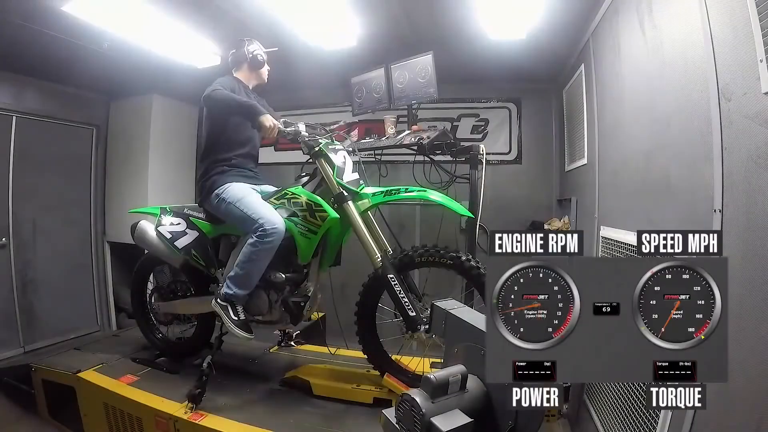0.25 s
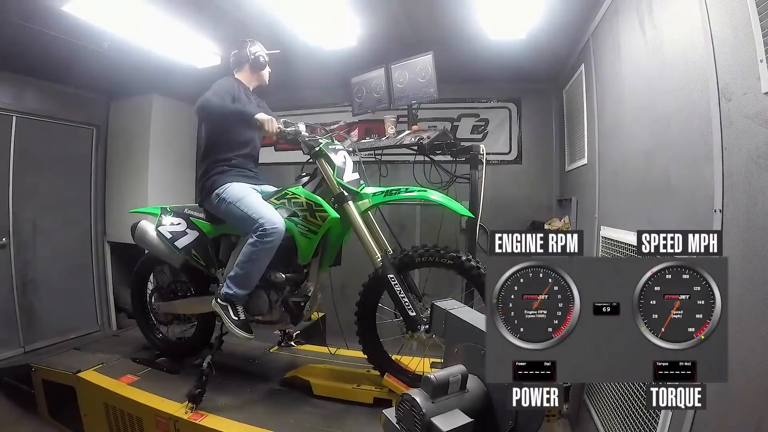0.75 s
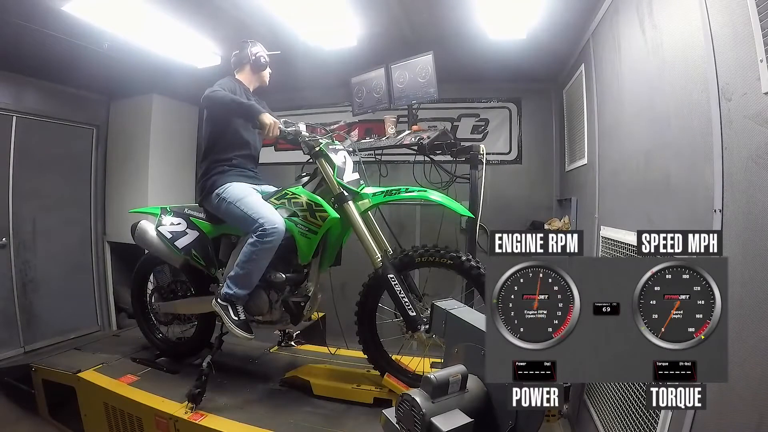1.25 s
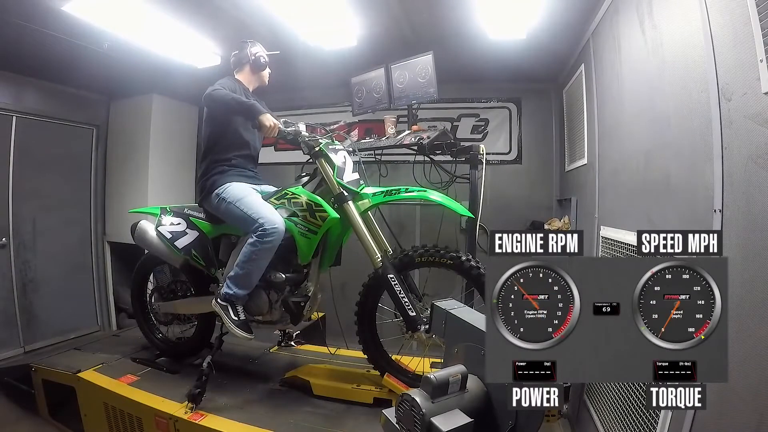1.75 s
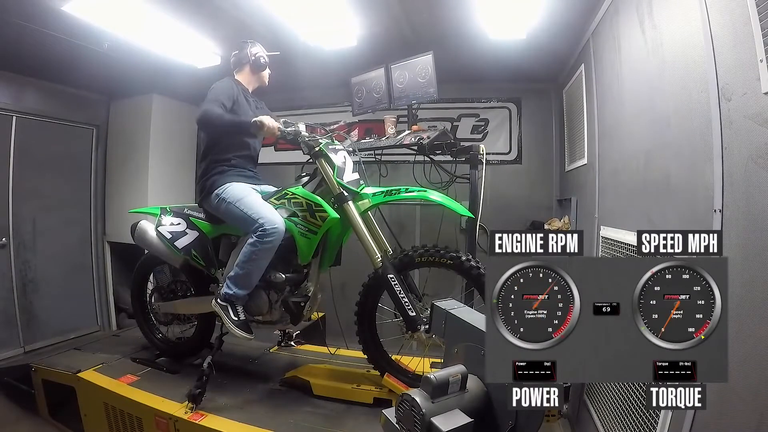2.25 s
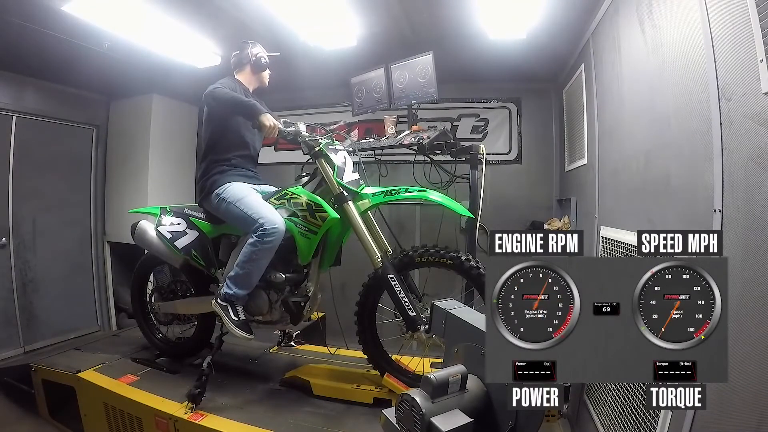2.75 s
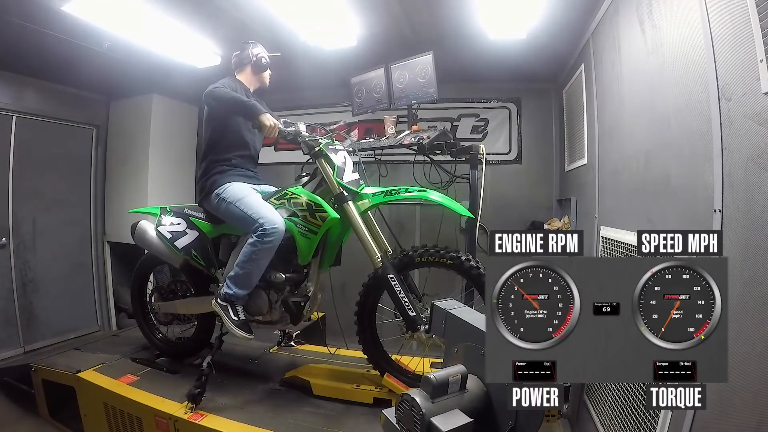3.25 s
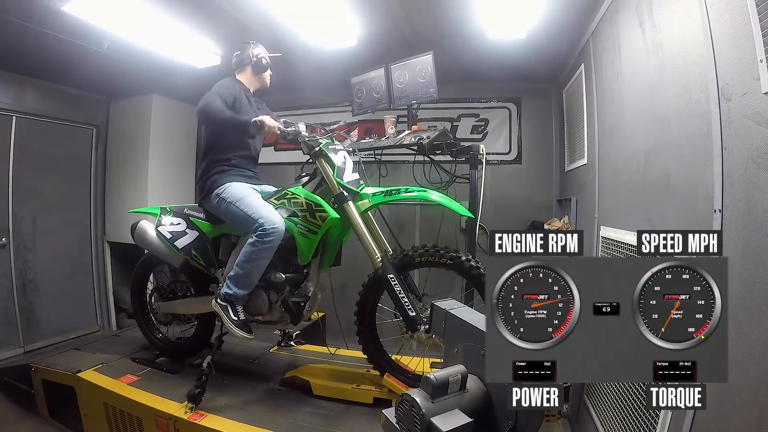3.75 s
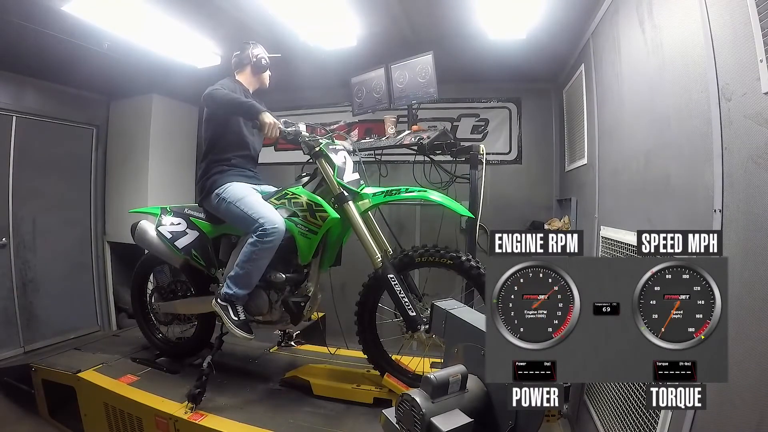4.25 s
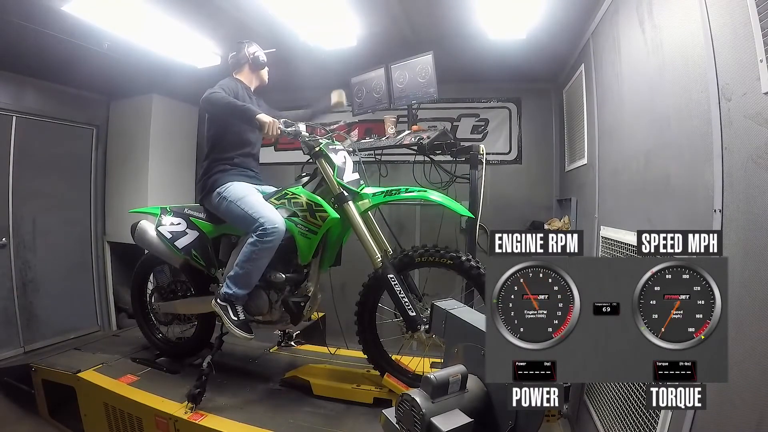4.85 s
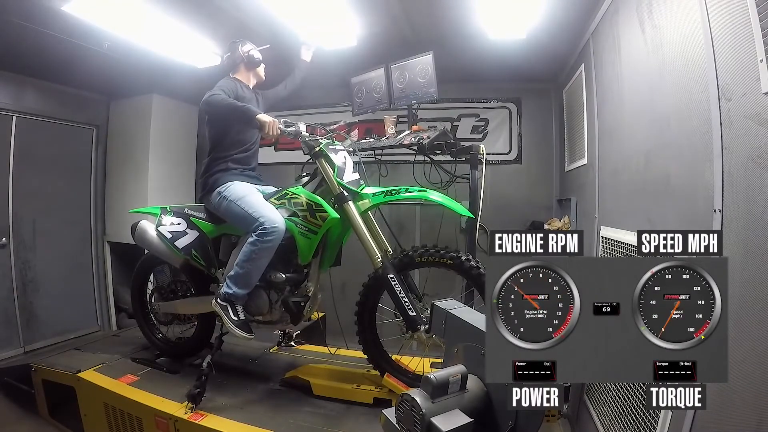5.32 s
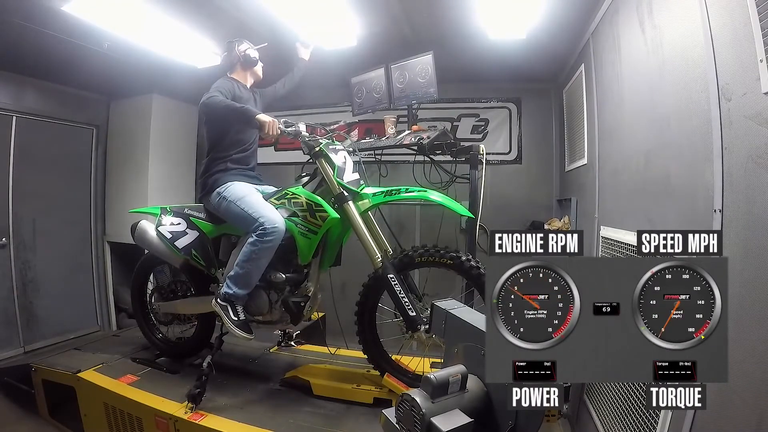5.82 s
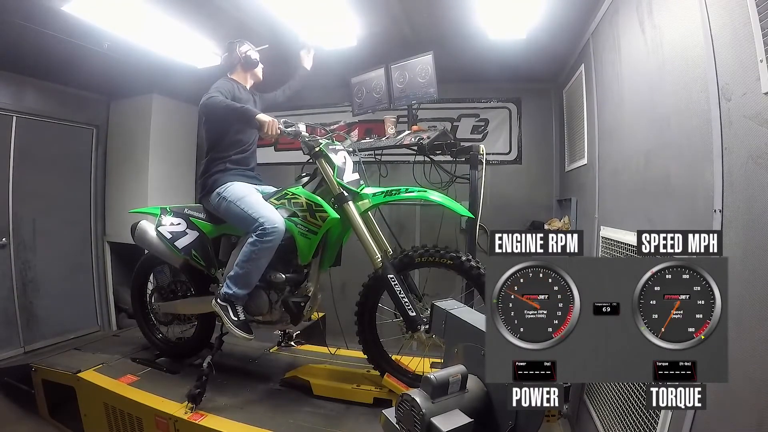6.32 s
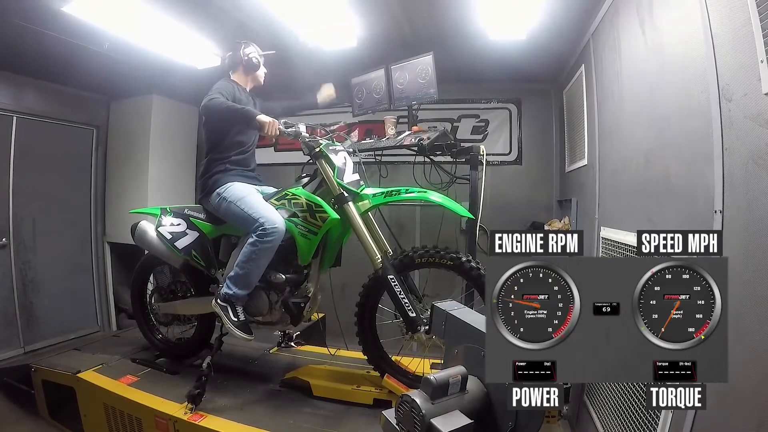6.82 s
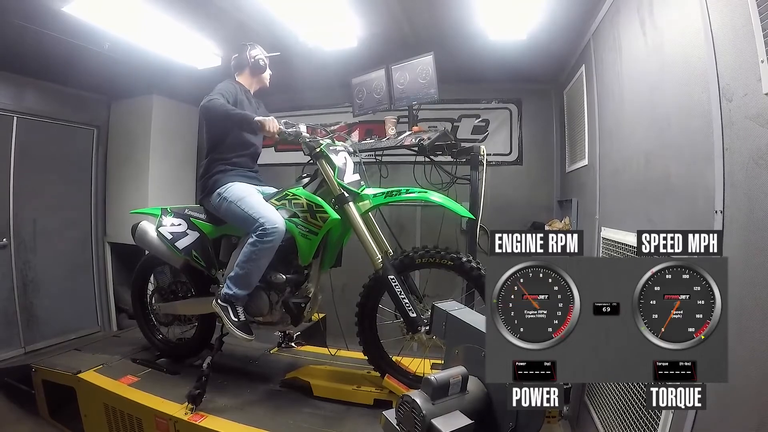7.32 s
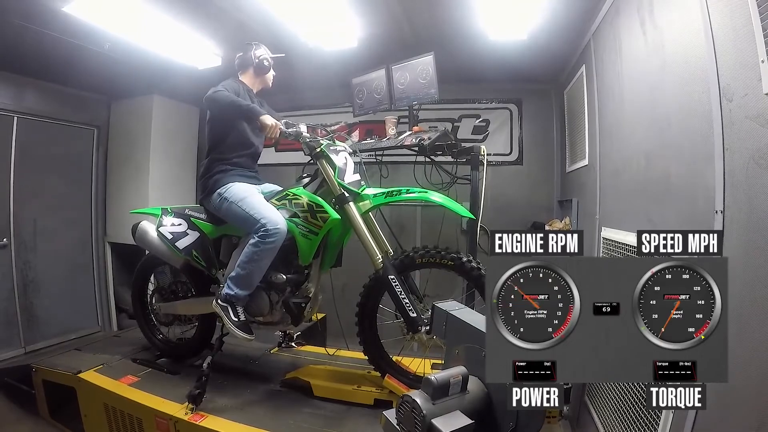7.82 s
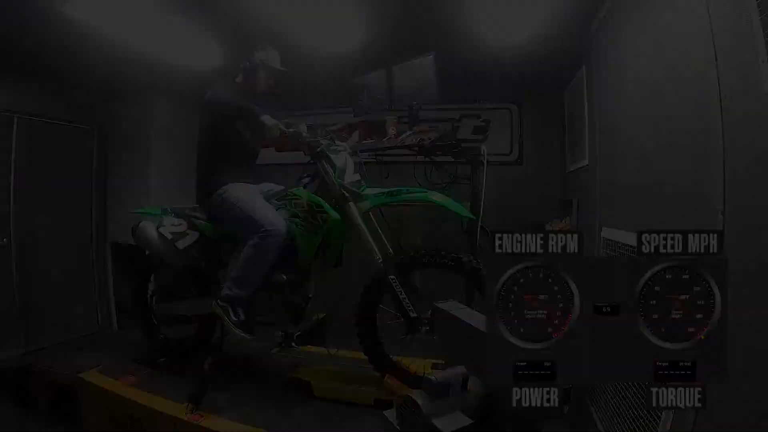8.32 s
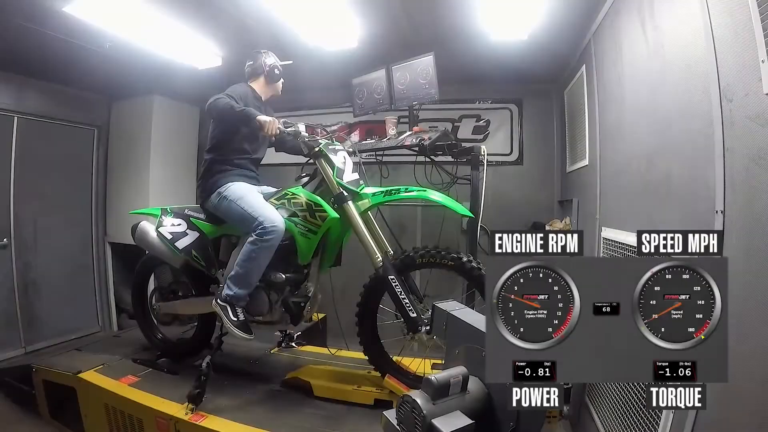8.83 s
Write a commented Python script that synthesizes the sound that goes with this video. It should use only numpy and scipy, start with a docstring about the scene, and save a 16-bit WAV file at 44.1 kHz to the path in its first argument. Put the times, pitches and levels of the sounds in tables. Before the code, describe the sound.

Thumping four-stroke motorcycle engine indoors: three quick blaring throttle blips with gliding fall-offs, then a lumpy idle, a near stall and pickup.

```python
"""A four-stroke single-cylinder dirt bike runs on a test stand in a small hard-walled room.
It idles, is blipped three times and coasts down, then runs unevenly, nearly stalls and picks up again.
One pressure pulse a cycle rings the exhaust resonances, with low throb and boom beneath; load adds blare.
Shaped noise makes the intake rasp and the chain and valve clatter; harmonics make the coasting note.
"""
import sys
import numpy as np
from scipy import signal
from scipy.fft import rfft, irfft, next_fast_len
from scipy.io import wavfile
from scipy.ndimage import uniform_filter1d

SR = 44100
rng = np.random.default_rng(int(sys.argv[2]) if len(sys.argv) > 2 else 0)


def int16_out(signal):
    """Quantize to a 16-bit WAV file."""
    q = np.round(np.clip(np.atleast_2d(signal).T, -1, 1) * 32767)
    wavfile.write(sys.argv[1], SR, q.astype(np.int16))


N = 400428
TIME = np.arange(N) / SR


def from_db(db):
    """Decibels to gain."""
    return 10 ** (np.asarray(db) / 20)


def rms_one(x):
    """Scale to unit power."""
    return x / np.sqrt(np.mean(x ** 2) + 1e-20)


def evened(x):
    """Near-unit power, smoothed over about a tenth of a second; single pulses keep their shape."""
    power = uniform_filter1d(uniform_filter1d(x ** 2, SR // 10), SR // 20)
    return x / np.sqrt(np.abs(power) + 1e-12)


def ramp(x, start, end):
    """Rises from 0 at start to 1 at end."""
    return np.clip((x - start) / (end - start), 0, 1)


def cut(x, hz, kind, order=2):
    """Butterworth low- or high-pass."""
    return signal.sosfilt(signal.butter(order, hz, kind, fs=SR, output="sos"), x)


def resonate(x, modes):
    """Parallel two-pole resonances with alternating signs."""
    out = np.zeros(N)
    for k, (hz, width, db) in enumerate(modes):
        radius = np.exp(-np.pi * width / SR)
        poles = [1, -2 * radius * np.cos(2 * np.pi * hz / SR), radius * radius]
        ringing = signal.lfilter([1, 0, -1], poles, x + 1e-18)
        out += (-1) ** k * from_db(db) * (1 - radius * radius) / 2 * ringing
    return out


def noise(spectrum):
    """Noise of a given colour, drawn over log frequency, at unit power."""
    hz, db = np.transpose(spectrum)
    size = next_fast_len(N)
    bins = rfft(rng.standard_normal(size))
    bin_hz = np.linspace(1, SR / 2, len(bins))
    gain = from_db(np.interp(np.log(bin_hz), np.log(hz), db))
    return rms_one(irfft(bins * gain, size)[:N])


# Speed the engine settles to with the throttle shut: (time [s], speed [cycles/s])
IDLE_SPEED = [(.45, 20), (.8, 41.1), (4.6, 39.9), (5.4, 41.3), (6.4, 37.6), (6.8, 30.5), (6.98, 27),
              (7.14, 27), (7.23, 22), (7.38, 39.4), (8, 41.6), (8.39, 39.7), (8.57, 36), (8.95, 39),
              (9.08, 36)]
# Twists of the throttle: (opens [s], shuts [s], top speed before smoothing [cycles/s], load [0-1])
THROTTLE_TWISTS = [(0.451, .768, 119, 0.83), (2.033, 2.297, 126.4, 0.94), (3.668, 3.942, 126.5, 0.93),
                   (7.222, 7.372, 47.6, 0.5)]
# Drag slows the engine until it fires again at the catch speed and eases down to idle
DRAG_PER_S, CATCH_HZ, SETTLE_S, FLYWHEEL_S = 1.07, 61.8, 0.32, 0.06


def engine_speed():
    """Cycles per second: blips climb steadily, drag pulls back to idle, the flywheel smooths it all."""
    idle = np.interp(TIME, *np.transpose(IDLE_SPEED))
    rate = idle
    for opens, shuts, top, _ in THROTTLE_TWISTS:
        opening_speed = np.interp(opens, TIME, rate)
        climb = np.interp(TIME, [opens, shuts], [opening_speed, top])
        catch = min(top, CATCH_HZ)
        caught = shuts + np.log(top / catch) / DRAG_PER_S
        coast = top * np.exp(-DRAG_PER_S * (TIME - shuts))
        settle = idle + (catch - idle) * np.exp(-np.maximum(TIME - caught, 0) / SETTLE_S)
        rate = np.select([TIME < opens, TIME < shuts, TIME < caught], [rate, climb, coast], settle)
    return uniform_filter1d(rate, int(FLYWHEEL_S * SR))


def engine_load(attack_s=0.018, release_s=0.061, lead_s=0.027):
    """Load 0-1: comes on fast, holds, and starts to die away just before the throttle shuts."""
    held = np.zeros(N)
    for opens, shuts, _, load in THROTTLE_TWISTS:
        attack = ramp(TIME, opens, opens + attack_s)
        release = 1 - ramp(TIME + lead_s, shuts, shuts + release_s)
        held += load * attack * release
    return np.clip(held, 0, 1)


# The engine's voice with the throttle shut: (speed [cycles/s], cycle order [dB], crank order [dB], pipe drone
# [dB], exhaust bark [dB], clatter before the throttle lift [dB], roughness [0-1])
SHUT_VOICE = [(21.4, -51, -29, -14, -26.5, -42, 0.02), (27.8, -29, -13.5, -17.5, -24.5, -40, 1),
              (36.5, -29, -18, -13, -23.5, -42.5, 0.67), (42.3, -28.5, -13, -14, -25, -40, 0.42),
              (44.6, -30.5, -16, -18.5, -28, -43.5, 0.79), (54.83, -32.5, -14.5, -17, -28, -44.5, 0.46),
              (59.5, -28.5, -11, -14, -21.5, -44, 0.1), (66.6, -22.5, -43, -14.5, -19, -44, 0.14),
              (80.8, -19.5, -47, -23.5, -20.5, -39, 0.1), (97, -18, -17, -27.5, -21.5, -39.5, .08),
              (114, -15, -34, -24.5, -23, -34.5, 0.54)]
# Full load lifts the cycle order; the other levels and the fairly even combustion ignore speed
LOAD_CYCLE_LIFT_DB, LOAD_CRANK_DB, LOAD_DRONE_DB, LOAD_BARK_DB = 2, -17, -11.5, -14
LOAD_CLATTER_DB, LOAD_ROUGH = -40, 0.28


def voice(rate, load):
    """Levels and roughness follow the speed; load draws them to their full-throttle values."""
    speeds, *columns = np.transpose(SHUT_VOICE)
    shut = [np.interp(rate, speeds, column) for column in columns]
    loaded = [shut[0] + LOAD_CYCLE_LIFT_DB, LOAD_CRANK_DB, LOAD_DRONE_DB,
              LOAD_BARK_DB, LOAD_CLATTER_DB, LOAD_ROUGH]
    return [a + load * (b - a) for a, b in zip(shut, loaded)]


# Firings that stand out as separate bangs: (time [s], pulse level [dB])
SINGLE_BANGS = [(.457, .5), (.494, -13), (.522, -6.5), (2.038, -4.5), (2.06, -7.5), (3.672, -12.5),
                (3.694, -20), (5.876, -9), (5.953, -7.5), (6.556, -8.5), (6.676, -7), (6.986, -9.5),
                (7.071, 1.5), (7.116, 0.5), (7.162, 4), (7.209, 2), (7.254, -1.5), (7.286, 1)]
# Spells of loping, evenly spaced bangs:
# (first [s], last [s], rough gap [s], pulse level [dB], every second bang weaker by [dB])
LOPING_SPELLS = [(.009, .410, .05, 4.5, 8), (6.003, 6.44, .0545, -6, 0.5), (8.589, 9.068, .06, -13.5, -1)]


def all_bangs():
    """Times and pulse levels of the single bangs and of the loping spells, in order."""
    bangs = [tuple(bang) for bang in SINGLE_BANGS]
    for first, last, gap, db, weaker_db in LOPING_SPELLS:
        times = np.linspace(first, last, round((last - first) / gap) + 1)
        bangs += [(s, db - weaker_db * (k % 2)) for k, s in enumerate(times)]
    return np.transpose(sorted(bangs))


def engine_cycles(rate, bang_s):
    """Running count of four-stroke cycles, bent so that every bang falls on a whole cycle."""
    turns = np.cumsum(rate) / SR
    free = np.interp(bang_s, TIME, turns)
    steps = np.maximum(np.round(np.diff(free)), 1)
    whole = 1 + np.append(0, np.cumsum(steps))
    return turns + np.interp(TIME, bang_s, whole - free), whole.astype(int)


def firings(cycles, bang_cycles, bang_db, rough, plain_db=-14, scatter_db=3.5, jitter_s=0.00041):
    """One pressure pulse a cycle: all pulses, the bangs alone, and the strength held through each cycle."""
    count = int(cycles[-1]) + 1
    at = np.interp(np.arange(count), cycles, TIME)
    uneven = np.interp(at, TIME, rough)
    chance = rng.standard_normal((count, 2))
    strength = from_db(plain_db + scatter_db * uneven * chance[:, 0])
    strength[bang_cycles] = from_db(bang_db)
    strength[0] = 0
    jittered = at + jitter_s * uneven * chance[:, 1]
    index = np.clip(jittered * SR, 0, N - 1).astype(int)
    pulses, bangs = np.zeros((2, N))
    pulses[index] = strength
    bangs[index[bang_cycles]] = strength[bang_cycles]
    return pulses, bangs, strength[np.clip(cycles.astype(int), 0, count - 1)]


def boom(bangs, rate, thud_db=52):
    """A bang sets the air in the whole exhaust swinging, most of all at slow idle."""
    slow_bangs = bangs / (1 + (rate / 33) ** 4)
    swing = resonate(slow_bangs, [(109.0, 21.7, thud_db), (68, 72, 41.7)])  # Hz, width Hz, dB
    return cut(swing, 220, "low")


def throb(cycles, cycle_db, crank_db, rough, rumble_db=3.0):
    """The piston pumps air once a cycle and once a crank turn, over a rumble when it runs unevenly."""
    angle = 2 * np.pi * cycles
    orders = from_db(cycle_db) * np.sin(angle) + from_db(crank_db) * np.cos(2 * angle)
    rumble = noise([(15, -28.5), (45, -6.0), (75, -5), (115, 5.0), (160, -8.5), (400, -57), (1500, -92.0)])
    return np.sqrt(2) * orders + from_db(crank_db + rumble_db) * rough * rumble


# Echoes from the nearest walls: (delay [s], level [dB])
WALL_ECHOES = [(.0052, -14.5), (0.0135, -19)]


def room(x, wet_db, t60_s=0.34):
    """Hard walls return early echoes and a short diffuse tail."""
    t = TIME[:SR // 3]
    tail = rng.standard_normal(len(t)) * from_db(-60 * t / t60_s) * (t > 0.006)
    response = from_db(wet_db) * tail / np.linalg.norm(tail)
    response[0] = 1  # direct sound
    for delay, db in WALL_ECHOES:
        response[int(delay * SR)] += from_db(db)
    return signal.fftconvolve(x, response)[:N]


# Exhaust pipe resonances: (frequency [Hz], width [Hz], relative level [dB])
PIPE_MODES = [(121, 27, -0.5), (195.9, 18.6, 7), (233.4, 22.6, -1.5), (267, 18.4, -0.5), (330, 33.7, -4),
              (403.6, 26, -9.5)]
# Bark resonances, the narrow ones standing waves of the hard-walled room: (frequency [Hz], width [Hz], relative
# level [dB])
BARK_MODES = [(375, 78, -15), (477, 29, 1.5), (551.6, 33.8, 4), (645, 42.3, 1), (703, 44, 0.5),
              (770.6, 38.5, 0), (878.4, 32.7, -1), (978, 18.7, -6.5), (1100, 17.3, -4.5),
              (1232, 15, -13), (1447, 81, -28), (1630, 160, -25.5), (1880, 230, -23)]


def exhaust(pulses, gas, drone_db, bark_db):
    """Pulses and the turbulent gas behind them ring the pipe and the standing waves of the room."""
    drone = resonate(pulses + 0.054 * gas, PIPE_MODES)
    drone = cut(cut(drone, 130, "high"), 533, "low", order=4)
    bark = resonate(pulses + 0.03 * gas, BARK_MODES)
    bark = cut(cut(bark, 382, "high", order=4), 1500, "low")
    drone_in_room = from_db(drone_db) * evened(room(drone, wet_db=-3.5))
    bark_in_room = from_db(bark_db) * evened(room(bark, wet_db=-3.0))
    return drone_in_room + bark_in_room


# Colour of the valve train and chain: (frequency [Hz], relative level per Hz [dB])
CLATTER_COLOUR = [(1500, -0.5), (2300, -5), (2650, -10.5), (3150, 0.5), (4000, -5), (5400, -10.5),
                  (6800, -8), (8000, -15), (9300, -18), (10500, -30.5), (13000, -62.5)]
# Engine casing resonances: (frequency [Hz], width [Hz], relative level [dB])
CASING_MODES = [(560, 36.6, 12.5), (962, 186, 4), (1410, 247, -6.5), (1620, 110, -5.5), (1866, 145, -2),
                (2150, 150, -12.5)]
# Gear mesh tones: (multiple of the cycle rate, relative level [dB])
GEAR_TONES = [(32, -4), (44, -10.5), (48, -15)]


def mechanics(cycles, rate, clatter_db, tick_db=13, tick_s=0.0036, lead_s=0.0079):
    """Chain and gears hiss and whine; the valves tick just ahead of each exhaust pulse."""
    since_tick = (cycles + lead_s * rate) % 1 / rate
    tick = from_db(tick_db) * np.exp(-since_tick / tick_s) / (1 + (rate / 32) ** 4)
    rattle = from_db(1.3 * rms_one(cut(rng.standard_normal(N), 150, "low")))  # random level flutter
    clatter = evened(noise(CLATTER_COLOUR) * (rattle + tick))
    casing = from_db(10.0) * rms_one(resonate(rng.standard_normal(N) * rattle, CASING_MODES))
    mesh = sum(from_db(db) * np.sin(2 * np.pi * k * cycles) for k, db in GEAR_TONES)
    whine = mesh / (1 + (rate / 65) ** 4)  # fades at speed
    return from_db(clatter_db) * (clatter + casing + whine * rattle)


# Steepened-pulse resonances: (frequency [Hz], width [Hz], relative level [dB])
BLARE_MODES = [(300, 59, 1.5), (426, 210, -7), (917, 107, 0.5), (1180, 133, 0.5)]


def blare(pulses, load, blare_db=-18):
    """Steepened pulses make the silencer blare: extra resonances that fade in with load."""
    ringing = resonate(pulses, BLARE_MODES)
    ringing = cut(cut(ringing, 1230, "low", order=4), 240, "high")
    return from_db(blare_db) * load * evened(room(ringing, wet_db=-4.5))


# Colour of the open intake: (frequency [Hz], relative level per Hz [dB])
INTAKE_COLOUR = [(700, -15), (1300, 14.5), (1900, 8), (2600, -1.5), (3500, 5.5), (5000, -13), (8000, -13),
                 (11000, -46), (15000, -42)]


def intake(age, throttle, rasp_db=-26.5, gulp_s=0.002):
    """With the slide open, each cycle adds a sharp rasp of noise over a steady hiss."""
    gulp = np.exp(-age / gulp_s) + 0.26
    return from_db(rasp_db) * throttle * evened(noise(INTAKE_COLOUR) * gulp)


# Exhaust colour of the coasting note:
# (frequency [Hz], level of a harmonic passing there before the soft-stroke fall [dB])
PUMPING_COLOUR = [(140, -42), (205, -31), (275, -15.5), (330, -22.5), (370, -31.5), (435, -19),
                  (520, -31.5), (590, -18), (720, -23), (950, -15), (1130, -24), (1400, -31.5),
                  (1900, -34.5)]
# The stroke is soft: each harmonic above the knee (multiple of the cycle rate) is weaker by so many dB
PUMP_KNEE, PUMP_FALL_DB = 4.1, 2.6


def pumping(cycles, rate, coasting, count=20, smear=0.297):
    """Unfired, the piston pushes a clean gliding note out of the pipe, each stroke smeared over the cycle."""
    hz, db = np.transpose(PUMPING_COLOUR)
    on, note = coasting > 0, np.zeros(N)
    for k in range(2, count):
        level_db = np.interp(k * rate[on], hz, db) - PUMP_FALL_DB * max(k - PUMP_KNEE, 0)
        lag = smear * k / count  # in cycles
        note[on] += from_db(level_db) * np.cos(2 * np.pi * k * (cycles[on] - lag))
    return np.sqrt(2) * coasting * note


# Speeds where the rasp and the coasting note start and are full [cycles/s]
RASP_FROM_HZ, RASP_FULL_HZ = 57.4, 71.4
PUMP_FROM_HZ, PUMP_FULL_HZ = 54.4, 67.7


def scene():
    """All sources follow the crank; speed and load set the balance between them."""
    rate, load = engine_speed(), engine_load()
    cycle_db, crank_db, drone_db, bark_db, clatter_db, rough = voice(rate, load)
    rough = np.clip(rough, 0, 1)
    throttle = load * ramp(rate, RASP_FROM_HZ, RASP_FULL_HZ)
    coasting = (1 - load) * ramp(rate, PUMP_FROM_HZ, PUMP_FULL_HZ)

    bang_s, bang_db = all_bangs()
    cycles, bang_cycles = engine_cycles(rate, bang_s)
    age = cycles % 1 / rate  # seconds since the exhaust valve opened
    pulses, bangs, strength = firings(cycles, bang_cycles, bang_db, rough)
    puff = np.exp(-age / 0.0091) + 0.13
    gas = rng.standard_normal(N) * strength * rough * puff

    low = boom(bangs, rate) + throb(cycles, cycle_db, crank_db, rough)
    pipe = exhaust(pulses, gas, drone_db, bark_db) + blare(pulses, load)
    pipe += pumping(cycles, rate, coasting)
    bright = mechanics(cycles, rate, clatter_db + 4 * throttle) + intake(age, throttle)
    return (low + pipe + room(bright, wet_db=-10.5))[None]


def record(dry, top=0.83, cutoff_hz=12000):
    """The highest peaks are rounded and the extreme treble is cut."""
    rounded = dry / (1 + (dry / top) ** 6) ** (1 / 6)
    return cut(rounded, cutoff_hz, "low", order=10)


dry = scene()
out = record(dry)
int16_out(out)
```